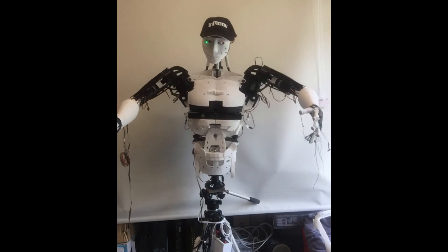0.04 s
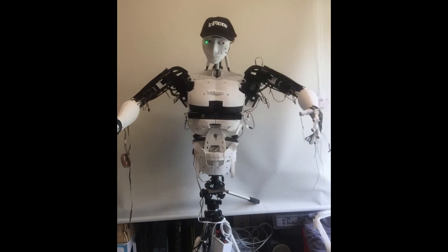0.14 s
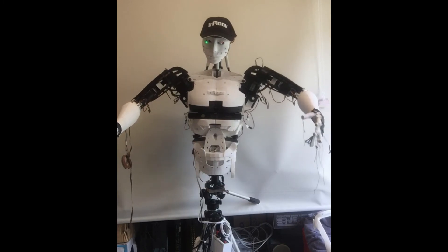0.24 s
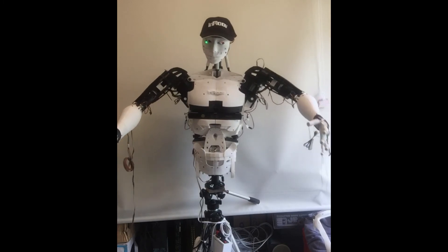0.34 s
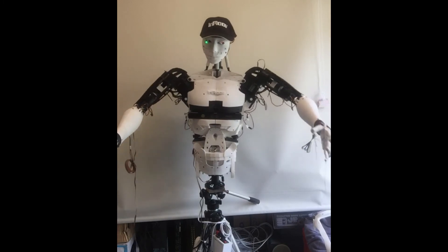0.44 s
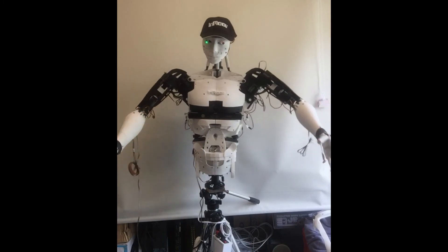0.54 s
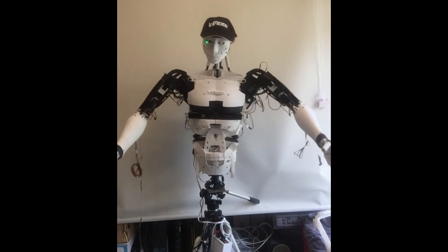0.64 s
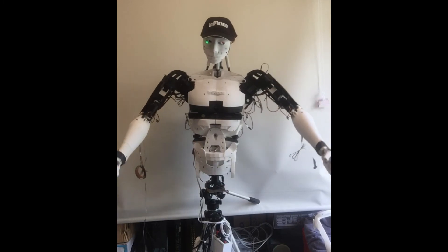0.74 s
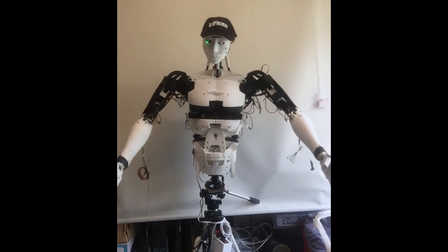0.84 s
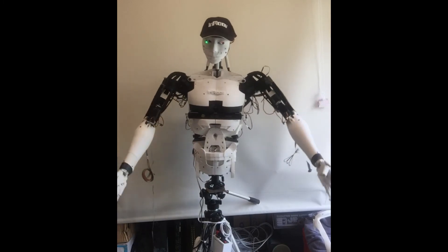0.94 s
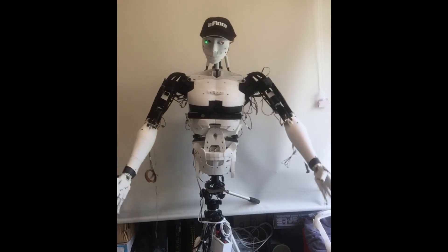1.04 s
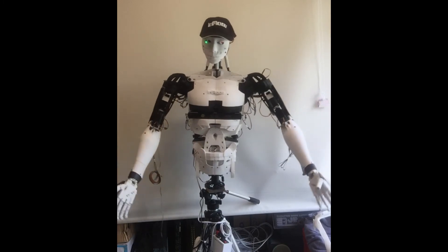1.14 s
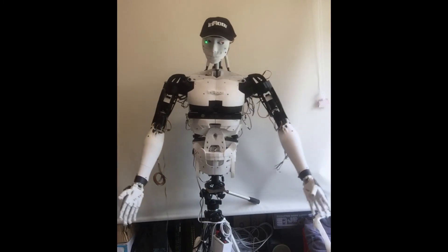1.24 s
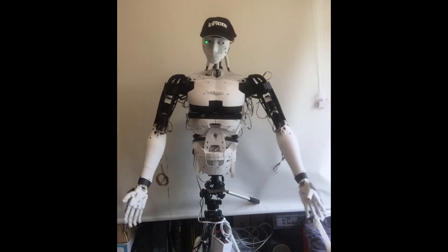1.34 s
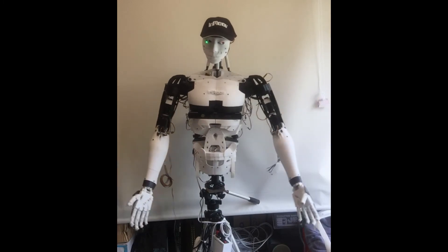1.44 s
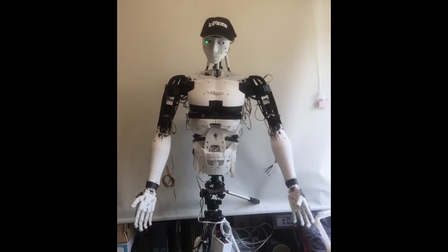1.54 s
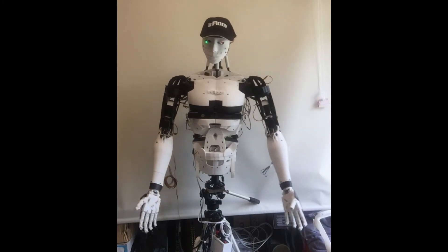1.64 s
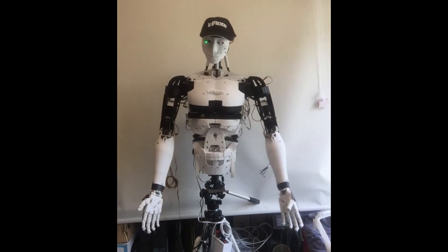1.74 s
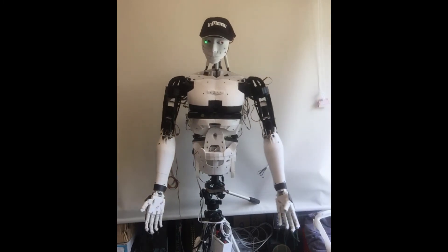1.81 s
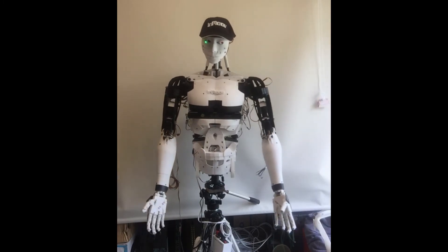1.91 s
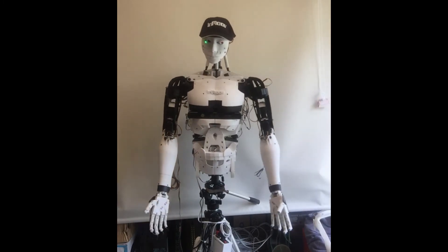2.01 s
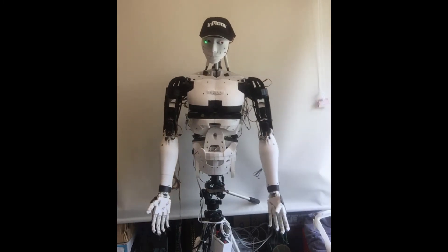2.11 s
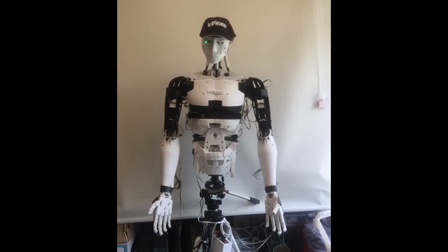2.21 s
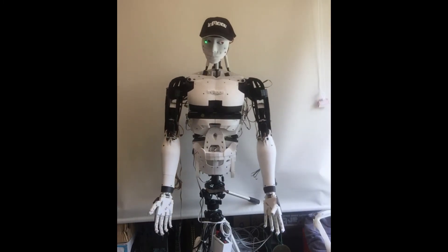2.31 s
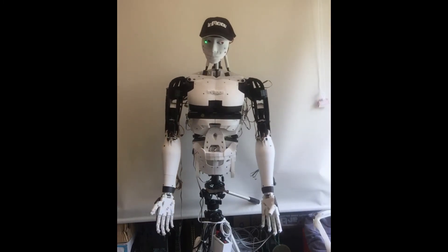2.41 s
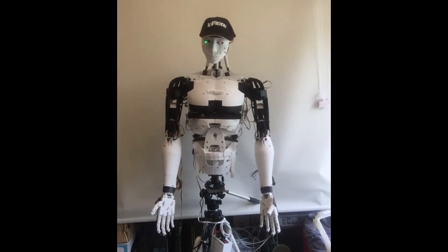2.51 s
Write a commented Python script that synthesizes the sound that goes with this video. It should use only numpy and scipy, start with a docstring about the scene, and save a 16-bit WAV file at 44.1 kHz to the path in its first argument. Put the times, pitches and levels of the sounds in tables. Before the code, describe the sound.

Several small electric motors whir together in one smooth arm movement, rising fast and slowing gradually, with metallic ringing gear grind, soft low thumps and two sharp clicks over faint low room rumble, heard close and fairly dry.

```python
"""In a small room a humanoid robot lowers both arms.
Its servos buzz while holding, in noise pulsed at the control rate. Three motors then spin up, whine and slow down,
each a stack of sine partials locked to its speed. Random tooth impacts make the gear grind and ring the housings.
A joint clicks twice in bursts of noise, and dull thumps of swelling low sine sound over a low room rumble of noise.
Both channels are alike."""
import sys
import numpy as np
from scipy import signal
from scipy.fft import rfft, irfft
from scipy.io import wavfile
from scipy.ndimage import uniform_filter1d

SR = 44100
rng = np.random.default_rng(int(sys.argv[2]) if len(sys.argv) > 2 else 0)


def wav_out(sig):
    """Save sig, one row per channel (or a flat mono array), as 16-bit PCM at SR to the path in sys.argv[1]."""
    wavfile.write(sys.argv[1], SR, np.round(np.clip(np.atleast_2d(sig).T, -1, 1) * 32767).astype(np.int16))


N = 114660
TIME = np.arange(N) / SR  # s
TOP_SPEED_HZ = 655  # motor turns per second

# second motor, whose speed also paces the gear ringing: (time [s], turns per second [Hz], whine level [dB])
SECOND_SPEED = [(.12, 60, -62), (.28, 290, -46), (.38, 440, -35), (.455, 500, -36), (.57, 570, -37),
                (.655, 596, -38), (.76, 618, -44), (.97, 633, -39), (1.17, 624, -41), (1.3, 606, -50),
                (1.55, 562, -43), (1.72, 500, -42), (1.85, 428, -39), (1.95, 370, -54), (2.6, 150, -68)]


def from_db(db):
    """Turn decibels into gain."""
    return 10 ** (np.asarray(db) / 20)


def rms_one(x):
    """Scale to unit power."""
    return x / np.sqrt(np.mean(x ** 2) + 1e-20)


def in_time(rows):
    """Draw an automation curve of straight lines between (time, value) rows."""
    return np.interp(TIME, *np.transpose(rows))


def coloured(x, spectrum, tilt_db=0):
    """Shape a signal by a spectrum, tilted in dB per octave, and bring it to unit power."""
    hz, db = np.transpose(spectrum)
    table_octave = np.log2(hz)
    octave = np.log2(np.arange(N // 2 + 1) * SR / N + 1)
    # beyond both ends of the table the end level holds
    gain = from_db(np.interp(octave, table_octave, db + tilt_db * table_octave))
    return rms_one(irfft(rfft(x) * gain, N))


def drift(hz):
    """Smooth noise with a two-pole low-pass into a random modulator of spread 1."""
    r = np.exp(-2 * np.pi * hz / SR)
    noise = rng.standard_normal(N + SR)
    settled = signal.lfilter([1], [1, -2 * r, r * r], noise)[SR:]
    return rms_one(settled)


def motor(speed, orders):
    """Partials lock to a rotor, uneven below full speed; speeding up lifts the high ones, braking dulls them."""
    # how well the shells radiate the whine: (frequency [Hz], gain [dB])
    radiation = [(1000, -36), (1650, -23.5), (1930, -2), (2300, -24), (2850, -6), (3200, -4), (4200, -0.5),
                 (5000, 3), (6000, 5), (6800, -5), (7800, 4.5), (9000, -28), (13000, -2)]
    flutter, slow_flutter, flutter_hz = .0012, .035, 90  # speed fractions: always, and added towards standstill
    rough_db, rough_hz = 1.5, 68
    waver_db, waver_hz = 2.33, 11.2
    strain_db, full_strain_hz_per_s, strained_from_order = 6, 400, 12
    braking_strain = -.6  # lowest strain

    time, turns, level = np.transpose(speed)
    hz = np.interp(TIME, time, turns)
    level_db = np.interp(TIME, time, level)
    unsteady = flutter + slow_flutter * np.clip(1 - hz / TOP_SPEED_HZ, 0, 1)
    angle = 2 * np.pi * np.cumsum(hz * (1 + unsteady * drift(flutter_hz))) / SR
    acceleration = np.gradient(hz) * SR
    strain = np.clip(acceleration / full_strain_hz_per_s, braking_strain, 1)
    strain = uniform_filter1d(strain, size=SR // 20)
    out = np.zeros(N)
    for multiple, db in orders:
        tone_db = db + np.interp(multiple * hz, *np.transpose(radiation))
        if multiple >= strained_from_order:
            tone_db = tone_db + strain_db * strain
        chance_db = rough_db * drift(rough_hz) + waver_db * drift(waver_hz)
        out += from_db(level_db + tone_db + chance_db) * np.sin(multiple * angle)
    return out


def gears():
    """Dense random tooth impacts excite the arm shells; slow gears also ring the housings in fits."""
    # level of each noise band: (time [s], level [dB])
    middle_level = [(0, -86), (.11, -69), (.24, -57.5), (.39, -48.5), (.53, -52), (.65, -45), (.92, -44.5),
                    (1.33, -46.5), (1.55, -49), (1.68, -52.5), (1.82, -60), (2.2, -66.5), (2.6, -67.5)]
    treble_level = [(0, -67.5), (.1, -70.5), (0.149, -50), (.26, -39.5), (.39, -35), (.6, -33),
                    (1.1, -35.5), (1.45, -36), (1.84, -40.5), (1.93, -42.5), (2.02, -44), (2.25, -50.5),
                    (2.42, -56), (2.6, -59.5)]
    top_level = [(0, -83), (.11, -82), (.24, -56.5), (.4, -45.5), (.6, -42.5), (1, -44), (1.4, -44.5),
                 (1.82, -52), (2.049, -60), (2.25, -71.5), (2.6, -88)]
    # spectrum of each noise band: (frequency [Hz], relative level [dB])
    middle = [(230, -43), (350, -11.5), (430, -18.5), (520, 0), (660, -2.5), (760, -14), (1000, 0),
              (1300, -3), (1600, 3.5), (1950, 5), (2400, 2.5), (2800, -5), (3400, -15.5)]
    treble = [(2300, -39), (2800, -11), (3150, 1), (4000, 4.5), (4800, -0.5), (5700, 4), (6500, 2.5),
              (8000, -2), (8800, -13.5), (10500, -61)]
    top = [(7000, -22), (8800, 0.5), (10300, -3), (11500, 2), (12700, -1), (14000, -7), (15700, -13.5)]
    teeth_per_s, grind_db, grind_hz = 5000, 0.61, 23.4
    ring_db, ring_loss_db = 3.5, 13  # standstill level, and its loss at top speed
    ring_flicker_db, ring_flicker_hz = 3, 29.6

    signs = rng.choice([-1, 1], N)
    impacts = signs * (rng.random(N) < teeth_per_s / SR)
    teeth = impacts * from_db(grind_db * drift(grind_hz))
    pace = in_time([row[:2] for row in SECOND_SPEED]) / TOP_SPEED_HZ
    ring = from_db(ring_db - ring_loss_db * pace ** 2 + ring_flicker_db * drift(ring_flicker_hz))
    ringing_teeth = teeth + housing(ring * teeth)
    bands = [(teeth, middle, middle_level), (ringing_teeth, treble, treble_level), (teeth, top, top_level)]
    return sum(coloured(x, spectrum) * from_db(in_time(level)) for x, spectrum, level in bands)


def housing(x):
    """The gearbox shells ring as parallel two-pole resonators."""
    # shell resonances: (frequency [Hz], width [Hz], gain [dB])
    resonances = [(3414, 37, 2.5), (3750, 230, -0.5), (4520, 68, -1.5), (5274, 45, 12), (5450, 120, 1),
                  (7000, 140, -19), (7680, 20, -1)]
    out = np.zeros(N)
    for hz, width, db in resonances:
        r = np.exp(-np.pi * width / SR)
        poles = [1, -2 * r * np.cos(2 * np.pi * hz / SR), r * r]
        out += from_db(db) * (1 - r * r) / 2 * signal.lfilter([1, 0, -1], poles, x)
    return out


def holding_buzz():
    """Each control pulse twitches the gears until the move begins."""
    # buzz spectrum: (frequency [Hz], relative level [dB])
    buzz_spectrum = [(2500, -27), (3300, -6), (3600, 6.5), (4000, 3), (4400, -18), (5600, -22), (8000, -45)]
    control_hz, pulse_at_s = 49, 0.022
    hold_end_s, fade_s, hold_db = 0.074, 0.045, -52

    pulses = .5 + .5 * np.cos(2 * np.pi * control_hz * (TIME - pulse_at_s))
    holding = np.clip(1 - (TIME - hold_end_s) / fade_s, 0, 1)
    return from_db(hold_db) * holding * pulses * coloured(rng.standard_normal(N), buzz_spectrum)


def clicks():
    """Play in a joint is taken up with a short crack of decaying noise."""
    # cracks, the last two close enough to make one click: (time [s], level [dB], brightness [dB per octave])
    cracks = [(1.470, -32, 4), (2.505, -48.5, 0), (2.509, -37, 5)]
    # crack spectrum: (frequency [Hz], relative level [dB])
    crack_spectrum = [(600, -45), (1100, 10), (2100, 15), (3200, 1), (6200, -1), (8500, -11), (12000, -9),
                      (15500, -15)]
    decay_s = 0.0047

    out = np.zeros(N)
    for s, db, tilt in cracks:
        envelope = (TIME >= s) * np.exp(-np.abs(TIME - s) / decay_s)
        out += from_db(db) * envelope * coloured(rng.standard_normal(N), crack_spectrum, tilt)
    return out


def thumps():
    """Soft low knocks swell and die within a few cycles of a sine."""
    # knocks: (start time [s], envelope peak level [dB])
    knocks = [(.26, -51.5), (0.531, -53.5), (0.74, -36.5), (0.981, -51.5), (1.169, -57), (1.61, -51),
              (1.961, -61)]
    thump_hz, rise_s = 66, 0.029

    out = np.zeros(N)
    for s, db in knocks:
        age = np.maximum(TIME - s, 0)
        swell = (age / rise_s) ** 2
        out += from_db(db) * swell * np.exp(1 - swell) * np.sin(2 * np.pi * thump_hz * age)
    return out


def room_rumble():
    """Steady noise, heaviest in the lows, lies under everything."""
    # background spectrum: (frequency [Hz], relative level [dB])
    rumble_spectrum = [(25, -39), (42, -9), (62, 0.5), (95, 0.5), (130, -7.5), (220, -15), (500, -18.5),
                       (800, -19.5), (1120, -7), (1500, -25.5), (4000, -17.5), (9000, -40), (15500, -55)]
    return from_db(-61.5) * coloured(rng.standard_normal(N), rumble_spectrum)


def room(x, wet_db):
    """Walls add a short diffuse tail of decaying noise to the direct sound."""
    t60_s = 0.13
    t = TIME[:SR // 2]
    tail = rng.standard_normal(len(t)) * from_db(-60 * t / t60_s)
    tail = tail / np.sqrt(np.sum(tail ** 2))
    return x + from_db(wet_db) * signal.fftconvolve(x, tail)[:N]


def scene():
    """Mix motors, gears, joints and thumps over the rumble, alike in both channels."""
    # first and third motor: (time [s], turns per second [Hz], whine level [dB])
    lead_speed = [(.12, 80, -62), (.25, 292, -42), (.285, 342, -36), (.32, 385, -44), (.36, 446, -38),
                  (.415, 502, -38), (.5, 565, -47), (.69, 634, -39), (.82, 641, -43), (1.0, 652, -42),
                  (1.1, 654, -34), (1.26, 655, -40), (1.4, 644, -43), (1.56, 635, -43), (1.85, 572, -46),
                  (2.2, 432, -51), (2.6, 230, -66)]
    third_speed = [(.2, 150, -56), (.47, 543, -38), (.6, 605, -42), (.8, 630, -40), (.98, 642, -39),
                   (1.26, 647, -40), (1.42, 637, -45), (1.75, 530, -52), (2.02, 440, -48), (2.6, 250, -68)]
    # whine partials of each motor: (multiple of the speed, level [dB])
    lead_orders = [(3, -9), (8, -5), (12, -0.5), (16, -8), (20, -6.5)]
    second_orders = [(3, -6), (8, 1.5), (12, -4.5), (20, -8)]
    third_orders = [(3, 2.5), (5, 1.5), (7, -10), (10, 2), (12, -19)]

    rotors = motor(lead_speed, lead_orders)
    rotors += motor(SECOND_SPEED, second_orders)
    rotors += motor(third_speed, third_orders)
    whine = (rotors + housing(rotors)) / 2
    servos = room(whine, wet_db=-7) + room(gears() + holding_buzz(), wet_db=-4.5)
    mono = servos + room(clicks(), wet_db=2) + thumps() + room_rumble()
    return np.array([mono, mono])


def record(dry):
    """Cut the top steeply at 15.8 kHz, filtering forwards and backwards to keep the phase."""
    low_pass = signal.ellip(10, .1, 60, 15800, fs=SR, output="sos")
    return signal.sosfiltfilt(low_pass, dry)


dry = scene()
out = record(dry)
wav_out(out)
```